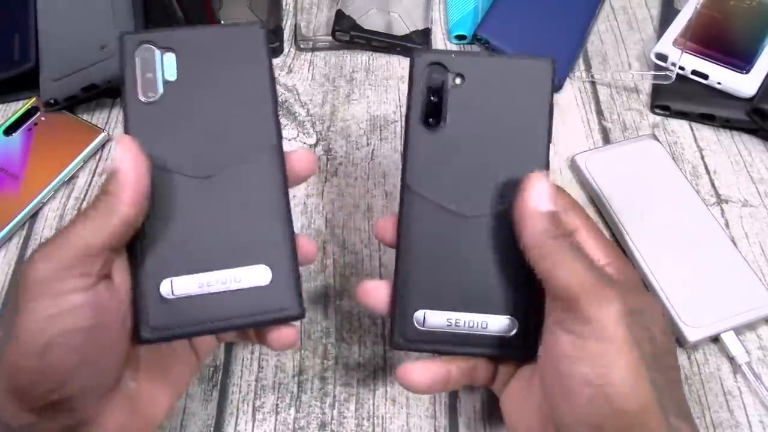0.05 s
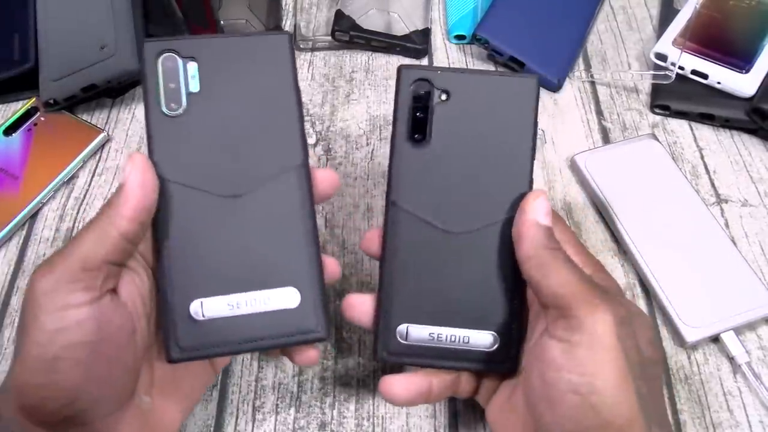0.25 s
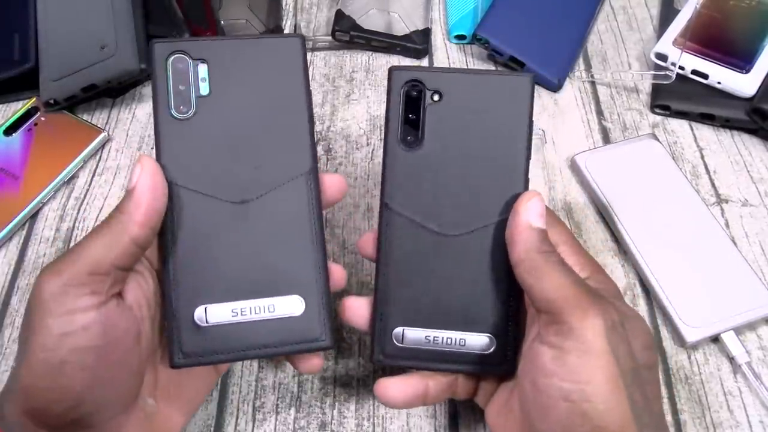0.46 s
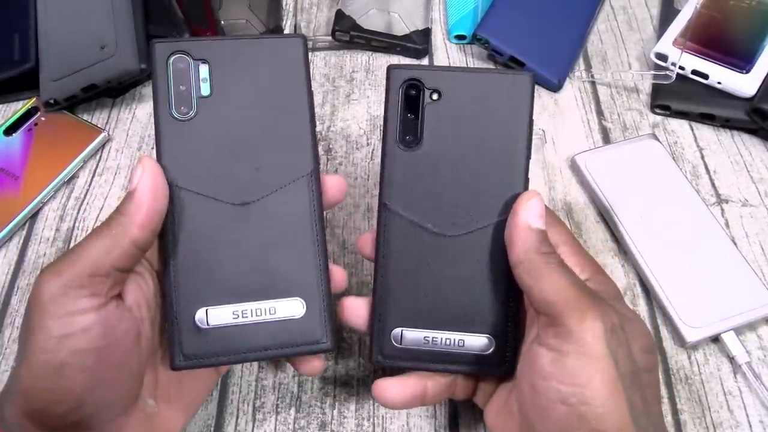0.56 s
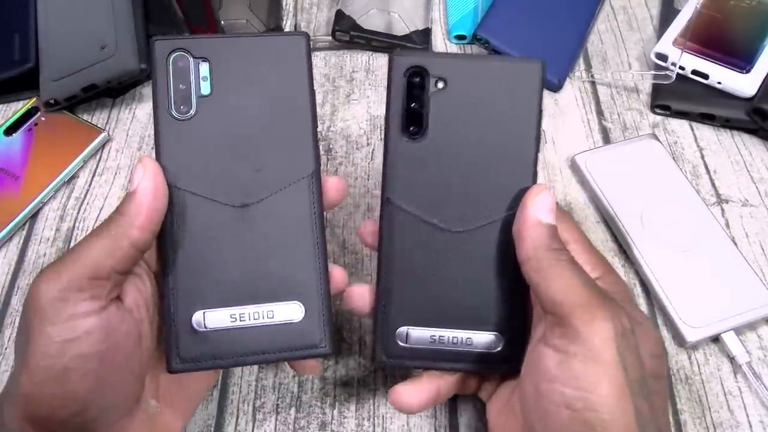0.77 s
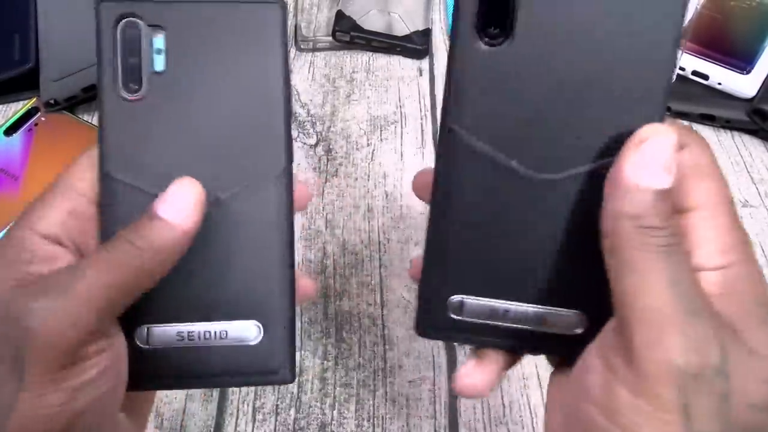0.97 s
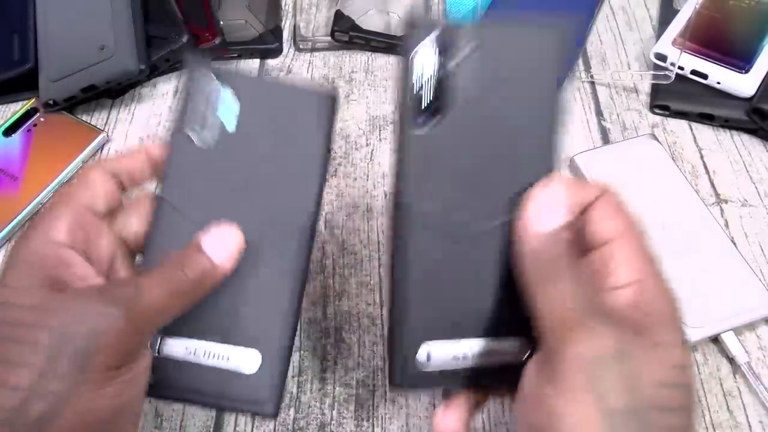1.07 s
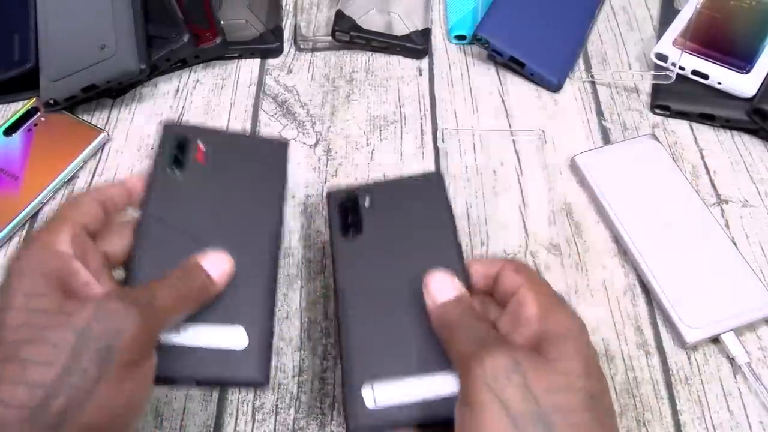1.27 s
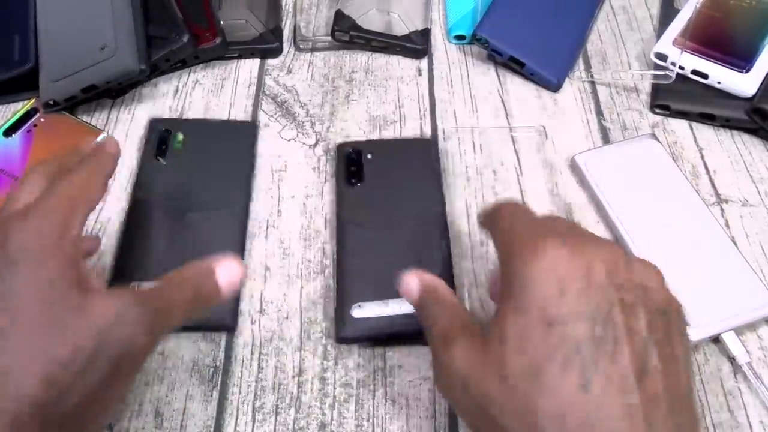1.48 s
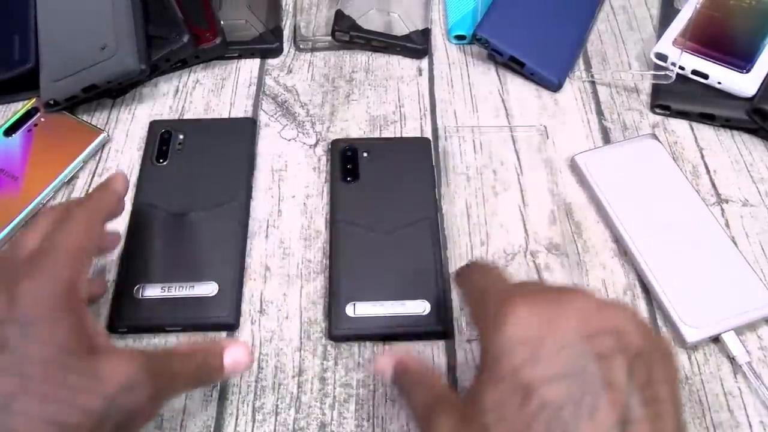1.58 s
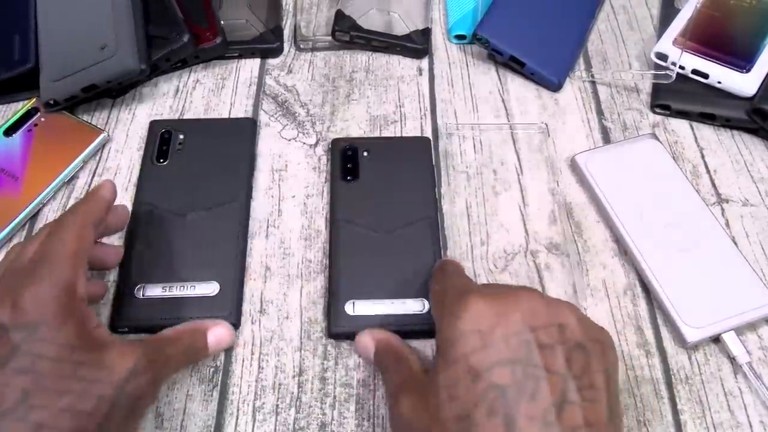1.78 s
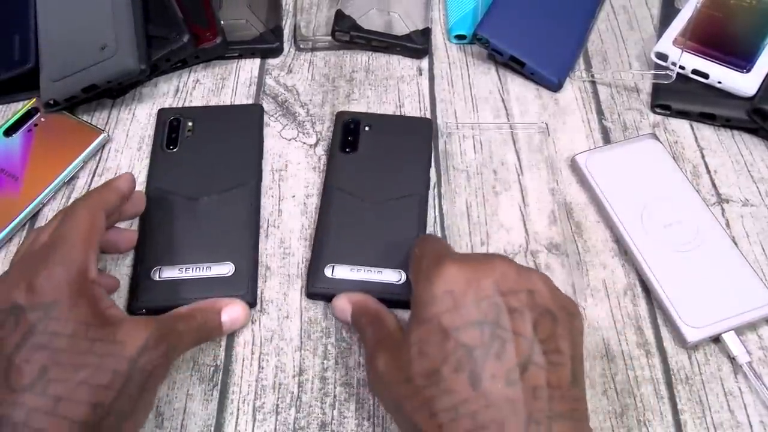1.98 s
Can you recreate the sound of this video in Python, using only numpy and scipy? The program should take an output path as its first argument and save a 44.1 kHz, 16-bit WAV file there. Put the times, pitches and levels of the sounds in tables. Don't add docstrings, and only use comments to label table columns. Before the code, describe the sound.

Phones in cases are handled softly with rustle, clicks and two short buzzes, then wood knocks and a rapid cluster of booming, distorted thumps follows, ending in light scraping on the tabletop, heard close indoors.

```python
import sys
import numpy as np
from scipy import signal
from scipy.fft import rfft, irfft
from scipy.io import wavfile
from scipy.ndimage import uniform_filter1d

SR = 44100
rng = np.random.default_rng(int(sys.argv[2]) if len(sys.argv) > 2 else 0)


def boost(x):
    u = np.asarray(x, float) / 20
    return 10 ** u


def dump_mix(stems):
    frames = np.atleast_2d(stems).T
    limited = np.clip(frames, -1, 1)
    pcm = np.round(limited * 32767).astype(np.int16)
    wavfile.write(sys.argv[1], SR, pcm)


N = 89831


def in_time(rows):
    s, db = np.transpose(rows)
    return np.interp(np.arange(N) / SR, s, db)


def noise():
    return rng.standard_normal(N)


def even(x):
    return x / x.std()


def filtered(x, hz, kind="low"):
    return signal.sosfilt(signal.butter(2, hz, kind, fs=SR, output="sos"), x)


def coloured(spectrum, x):
    hz, db = np.transpose(spectrum)
    f = np.maximum(np.arange(N // 2 + 1) * SR / N, 1)
    gain = boost(np.interp(np.log(f), np.log(hz), db))
    out = irfft(rfft(x) * gain, N)
    return out / np.sqrt(np.mean(out ** 2))


def drift(rate_hz):
    r = np.exp(-2 * np.pi * rate_hz / SR)
    settle = SR
    slow = signal.lfilter([1], [1, -2 * r, r * r], rng.standard_normal(N + settle))[settle:]
    return even(slow)


def ring(push, hz, t60):
    r = boost(-60 / (t60 * SR))
    w = 2 * np.pi * hz / SR
    return signal.lfilter([0, np.sin(w)], [1, -2 * r * np.cos(w), r * r], push + 1e-18)


def fading(s, t60):
    age = np.arange(N) / SR - s
    return (age >= 0) * boost(-60 * np.clip(age, 0, 3 * t60) / t60)


def rubbing(spectrum, level_db):
    grains_per_s, grain_db = 270, -8.5
    struck = rng.random(N) < grains_per_s / SR
    grains = struck * noise() * np.sqrt(SR / grains_per_s)
    hiss = coloured(spectrum, noise() + boost(grain_db) * grains)
    return hiss * boost(level_db + 1.95 * drift(33.0))


# (frequency [Hz], density [dB per Hz])
ROOM = [(12, -0.5), (28, -1), (72, -17), (125, -7.5), (330, -18), (700, -37.5), (2000, -36), (16000, -64)]


def room():
    fan = np.sin(2 * np.pi * 736 * np.arange(N) / SR)
    return boost(-52) * coloured(ROOM, noise()) + boost(-72) * fan


# (time [s], level [dB])
SLEEVES = [(0, -78), (.22, -59.5), (.4, -74), (1.1, -63), (1.3, -59), (1.5, -74)]


def sleeves():
    return boost(in_time(SLEEVES)) * even(filtered(noise(), [258, 764], "band"))


# (time [s], level [dB])
SWAY = [(0, -52.5), (.8, -54), (.95, -44.5), (1.1, -41.5), (1.2, -44), (1.4, -49), (1.9, -39.5),
        (2.04, -38)]


def arms_sway():
    return boost(in_time(SWAY)) * even(filtered(noise(), 56.5))


# (time [s], level [dB])
SLIDE = [(0, -62), (.06, -57), (.09, -64), (.21, -63.5), (.3, -71), (.82, -72.5), (.86, -60), (.9, -46.5),
         (.95, -50.5), (1.0, -57), (1.11, -66.5), (1.15, -48), (1.18, -55.5), (1.26, -66), (1.29, -58.5),
         (1.42, -57.5), (1.44, -69.5), (2.04, -102)]
# (frequency [Hz], density [dB per Hz])
SKIN = [(290, -28), (500, -6.5), (819, -5.5), (2010, -5), (3920, -4), (5970, -4.5), (7100, -7), (10500, -5),
        (16000, -12.5)]


def skin_slides():
    return rubbing(SKIN, in_time(SLIDE) + 4)


# (time [s], peak level [dB], frequency [Hz], ring length
# [cycles], snap level [dB])
TICKS_KNOCKS = [(.0188, -25, 9300, 7.1, -32.5), (.224, -37, 5700, 11, -50), (.2258, -28, 4150, 2.3, -46),
                (.2737, -41, 4800, 8.2, -69), (.274, -34, 6100, 12, -55), (.2754, -36.5, 2000, 7, -35.5),
                (.363, -52.5, 2000, 14, -60), (.4568, -50, 2100, 5, -70), (.8288, -38, 5100, 7, -56),
                (.921, -41, 1800, 6, -48), (.9273, -33.5, 1890, 12, -48), (.934, -35, 280, 6.6, -60),
                (.9345, -26.5, 4870, 18, -29), (.9415, -46, 6000, 4, -30.5), (.96, -36.5, 393, 11.4, -60),
                (.964, -37, 1260, 12, -55), (.9645, -31, 2320, 9.9, -62), (1.0419, -37, 4740, 20, -38),
                (1.042, -37, 418, 7.5, -60), (1.075, -50, 1250, 20, -70), (1.077, -45, 2620, 31, -66),
                (1.1045, -33.5, 8100, 17, -44), (1.1048, -40, 10100, 8.1, -50),
                (1.1245, -23.5, 285, 5.6, -56), (1.126, -33, 650, 7.2, -46), (1.1335, -27, 370, 8.4, -59),
          (1.138, -33, 205, 8.7, -60), (1.146, -35, 318, 19, -42), (1.1862, -19, 380, 5, -60),
          (1.187, -38, 782, 11, -57), (1.197, -29, 70, 3.2, -70), (1.1995, -30, 330, 6, -70),
          (1.2792, -50, 5830, 5, -38), (1.478, -42, 3200, 70, -63), (1.488, -46, 11600, 150, -66),
          (1.4935, -40, 3370, 40, -60), (1.495, -44, 1800, 12, -66), (1.5252, -12, 6400, 25, -40),
          (1.526, -18, 4500, 20, -60), (1.634, -27, 830, 25, -70), (1.635, -30, 3510, 40, -48),
          (1.776, -50, 7000, 8, -52), (1.826, -50, 6000, 8, -52), (1.928, -28, 193, 11.7, -68),
          (1.99, -46, 2500, 60, -66), (2.02, -44, 2600, 40, -66), (2.024, -25, 130, 4.9, -42),
          (2.027, -36, 800, 5, -52)]


def ticks_and_knocks():
    out = np.zeros(N)
    snap = filtered(noise(), [1400, 13000], "band")
    for s, db, hz, cycles, snap_db in TICKS_KNOCKS:
        phase = (np.arange(N) / SR - s) * hz
        push = np.sin(2 * np.pi * np.clip(phase, 0, 1)) * 2 * hz / SR
        out += boost(db) * ring(push, hz, cycles / hz)
        out += boost(snap_db) * fading(s, .0035) * snap
    return out


# (time [s], length [s], level [dB])
BUZZES = [
    (.405, 0.077, -41),
    (.522, 0.0776, -41.5),
]


def motor():
    t = np.arange(N) / SR
    out = np.zeros(N)
    motor_hz, rise_s, fall_s = 158, 0.0075, 0.0065
    rattle = even(ring(noise(), 2040, 0.0035))
    for s, length, db in BUZZES:
        shape = np.clip(np.minimum((t - s) / rise_s, (s + length - t) / fall_s), 0, 1)
        turn = 2 * np.pi * motor_hz * (t - s)
        hum = np.sin(turn) + boost(-21) * np.sin(2 * turn)
        growth = np.clip((t - s) / length, 0, 1)
        out += boost(db) * shape * (hum + boost(-23.5) * growth * rattle)
    return out


# (time [s], level [dB])
WHINE = [(0, -88), (1.18, -69.5), (1.21, -57.5), (1.3, -62), (1.43, -70), (1.7, -70.5), (1.95, -57),
         (2.04, -52)]


def wood_whine():
    return boost(in_time(WHINE)) * even(ring(noise(), 1456, 0.0061))


# (time [s], strength [dB], contact [ms], shake of the stand [dB], crack level [dB])
TOUCHES = [(1.1862, -62, 2.0, -32, -44), (1.1914, -38, 3.1, -44, -40), (1.214, -30, 5, -53.5, -70),
           (1.5055, 5.5, 2.3, -40, -22), (1.5245, 3.5, 2.06, -29, -26.5), (1.5288, -5, 2.38, -19, -40),
           (1.5328, -10.5, 2.9, -19, -49), (1.5407, 4, 2.5, -25, -18), (1.549, -13.5, 1.8, -17, -36.5),
           (1.563, -13.5, 1.8, -33, -59), (1.571, -17, 2.2, -37, -59.5), (1.5793, -8.5, 3.5, -31.5, -46),
           (1.591, -15, 3.6, -45, -63.5), (1.602, -16.5, 2.8, -38, -66), (1.6148, -16, 4.5, -42.5, -72),
           (1.63, -9.5, 2.1, -45, -43), (1.6338, -0.5, 2.19, -13, -45.5), (1.6412, -2.5, 2.3, -18.5, -35),
           (1.6498, -11, 2.43, -18.5, -52.5), (1.6717, -10.5, 5, -23.5, -71), (1.707, -31, 8.4, -40, -77)]


def contact(s, ms):
    span = slice(int(s * SR), int((s + ms / 1000) * SR) + 2)
    t = (np.arange(N) / SR)[span]
    pulse = np.sin(np.pi * np.clip((t - s) * 1000 / ms, 0, 1)) ** 2
    return span, pulse / pulse.sum()


# (frequency [Hz], level [dB], t60 [s])
TABLE = [(124.6, -9, 0.0266), (188, -4, 0.013), (244, -2.5, 0.015), (254, -9, 0.031), (314, -14.5, 0.093),
         (377.6, -11.5, 0.052), (458, -18.5, 0.093), (567, -24, 0.077), (743, -42, 0.044),
         (890, -46, 0.054), (940, -26, 0.023), (1080, -28.5, 0.032), (1280, -33, .03), (1860, -38.5, .02)]


def tabletop():
    pushes = np.zeros((len(TABLE), N))
    spread_db = 2.5 * rng.standard_normal((30, len(TABLE)))
    for (s, db, ms, _, _), uneven_db in zip(TOUCHES, spread_db):
        span, pulse = contact(s, ms)
        pushes[:, span] -= boost(db + uneven_db)[:, None] * pulse
    wood = sum(boost(db) * ring(p, hz, t60) for p, (hz, db, t60) in zip(pushes, TABLE))
    beam = boost(-15) * ring(pushes[1], 64, 0.17)
    return filtered(wood, 109, "high") + beam


# (frequency [Hz], level [dB], t60 [s])
STAND = [(32.94, 2.5, 0.7), (120.6, -15, 0.75), (94, -16.5, 0.39), (68, -0.5, 0.16)]


def stand():
    shake = np.zeros(N)
    for s, _, ms, shake_db, _ in TOUCHES:
        span, pulse = contact(s, ms)
        shake[span] -= boost(shake_db) * pulse
    shake = filtered(shake, 179)
    return sum(boost(db) * ring(shake, hz, t60) for hz, db, t60 in STAND)


# (frequency [Hz], density [dB per Hz])
RUMBLE = [(60, 7), (200, 11), (500, -12.5), (1000, -32), (1500, -29), (2500, -41), (16000, -63.5)]


def dull_tail():
    level = np.zeros(N)
    for s, db, _, _, _ in TOUCHES:
        level += boost(db - 28.5) * (fading(s, 0.21) - fading(s, 0.025))
    return level * coloured(RUMBLE, noise())


# (time [s], level [dB], t60 [s])
SCUFFS = [
    (1.5252, -25.5, 0.034),
    (1.531, -38.5, 0.073),
    (1.5412, -35.5, 0.037),
    (1.546, -38.5, 0.24),
    (1.55, -38.5, .012),
    (1.634, -43, 0.12),
]
# (frequency [Hz], density [dB per Hz])
CRACK = [(200, -13), (700, 6), (1200, 0), (2000, -10.5), (3500, -15.5), (6500, -22), (9000, -24),
         (16000, -32)]


def cracks_and_scuffs():
    level = np.zeros(N)
    for s, _, _, _, crack_db in TOUCHES:
        level += boost(crack_db) * (fading(s + .0004, .011) - fading(s + .0004, .003))
    for s, db, t60 in SCUFFS:
        level += boost(db) * fading(s, t60)
    return level * coloured(CRACK, noise())


# (time [s], level [dB])
SHOVES = [
    [(1.46, -99), (1.475, -56.5), (1.5, -45.5), (1.51, -88.5)],
    [(1.76, -57.5), (1.85, -54), (1.89, -50), (1.95, -45.5), (1.98, -46), (2.04, -47.5)],
]
# (frequency [Hz], density [dB per Hz])
WOOD = [(150, -22), (250, -2), (414, -12), (476, -4.5), (971, -22), (1470, -21), (2130, -17),
        (10200, -21.5), (16000, -33)]


def case_shoves():
    before, after = map(in_time, SHOVES)
    return rubbing(WOOD, np.where(np.arange(N) < 1.6 * SR, before, after))


def scene():
    blows = tabletop() + stand() + cracks_and_scuffs() + dull_tail()
    hands = skin_slides() + case_shoves() + wood_sounds()
    faint = filtered(hands + motor() + sleeves() + room(), 14, "high")
    start_db, slope, release_db_per_s = -18.5, 0.78, 58.5
    ramp = release_db_per_s * np.arange(N) / SR
    held = np.maximum.accumulate(20 * np.log10(np.abs(blows) + 1e-6) + ramp) - ramp
    duck = boost(-slope * uniform_filter1d(np.maximum(held - start_db, 0), size=90))
    low = signal.sosfiltfilt(signal.butter(2, 2040, fs=SR, output="sos"), faint)
    return (blows + low + duck * (faint - low))[None]


def wood_sounds():
    return arms_sway() + wood_whine() + ticks_and_knocks()


def low_pass(x):
    return signal.sosfilt(signal.butter(12, 16210, fs=SR, output="sos"), x)


def record(dry):
    ceiling = 1.03
    clipped = dry / (1 + np.abs(dry / ceiling) ** 12) ** (1 / 12)
    centred = signal.lfilter([1, -1], [1, -.999], clipped)
    cut = signal.sosfilt(signal.cheby2(12, 50, 16450, fs=SR, output="sos"), centred)
    return low_pass(cut)


dry = scene()
out = record(dry)
dump_mix(out)
```